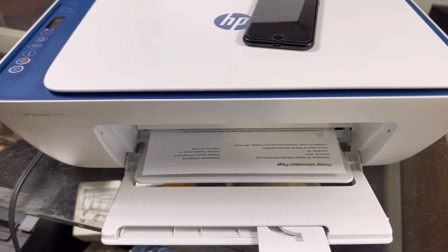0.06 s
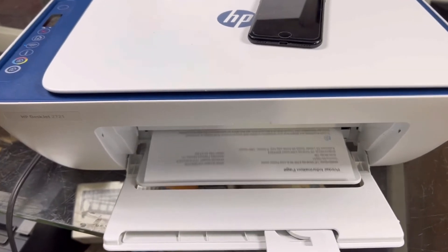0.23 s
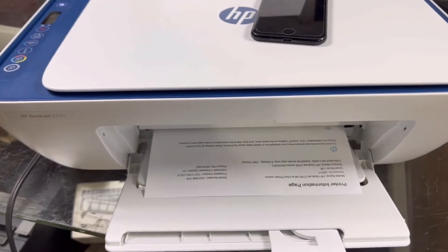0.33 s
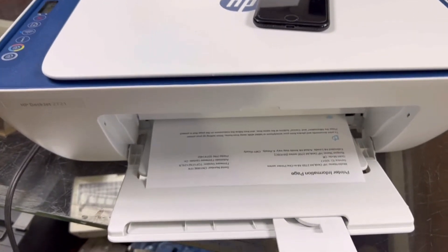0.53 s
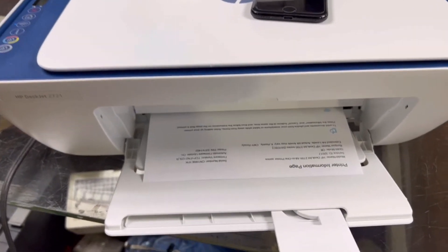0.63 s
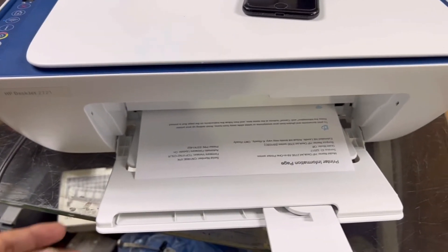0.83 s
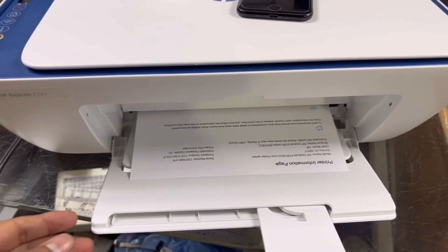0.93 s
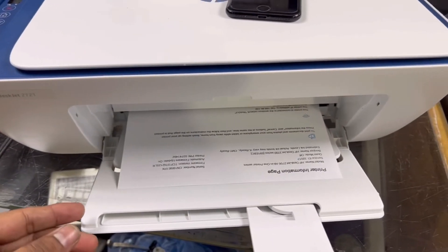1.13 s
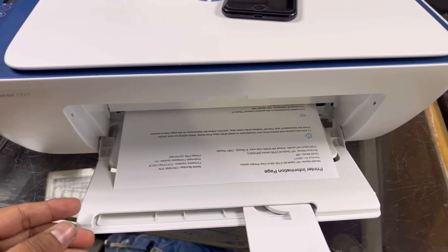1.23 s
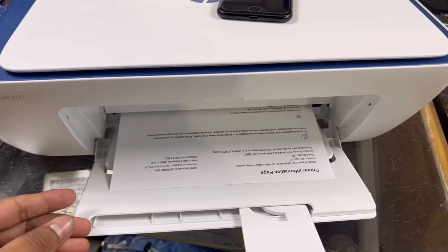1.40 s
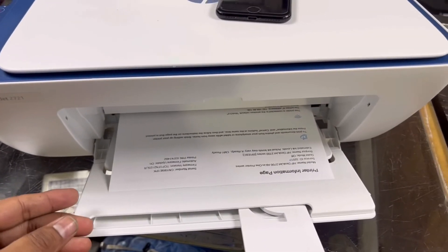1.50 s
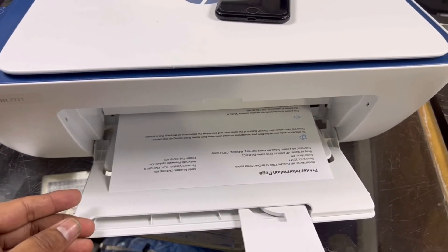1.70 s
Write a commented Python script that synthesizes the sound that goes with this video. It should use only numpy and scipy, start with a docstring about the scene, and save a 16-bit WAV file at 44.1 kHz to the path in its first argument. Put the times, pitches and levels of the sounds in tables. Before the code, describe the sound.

An inkjet printer feeds out a page in two short geared bursts, then clicks sharply

```python
"""In a small room, close by an inkjet printer: two short runs of its geared feed roller push a page out.
Uneven bursts of noise make the gear teeth, and resonances of the plastic housing answer them.
From the end of the second run the motor creeps on with a thin whine, and a catch cracks and rings.
Filtered noise makes the sheet sliding on its tray, the rumble of rolling parts, the hum and the room air.
A microphone pair hears the drive mostly a little to the right, the rest spread around."""
import sys
import numpy as np
from scipy import signal
from scipy.fft import rfft, irfft, next_fast_len
from scipy.io import wavfile
from scipy.ndimage import uniform_filter1d, map_coordinates

SR = 44100
rng = np.random.default_rng(int(sys.argv[2]) if len(sys.argv) > 2 else 0)


def unload_audio(sound):
    """Save the sound as a 16-bit wav file, at the path given as the first command line argument."""
    columns = np.transpose(np.atleast_2d(sound))
    # keep every value between -1 and 1, then stretch to whole-number steps
    steps = np.round(np.clip(columns, -1, 1) * 32767)
    wavfile.write(sys.argv[1], SR, steps.astype(np.int16))


N = 77175  # samples, 1.75 s

# Colours and partial levels are relative, except the idle tones, whose levels are absolute.
# low hum under the room: (frequency [Hz], level [dB])
HUM_COLOUR = [(20, -22), (38, -11.5), (55, -2.5), (75, -2.5), (100, -1.5), (140, -9), (200, -18.5),
              (320, -26), (600, -68)]
# room air: (frequency [Hz], level [dB])
AIR_COLOUR = [(120, -24.5), (270, -9), (380, -7), (550, -14), (900, -9.5), (1100, -11), (1480, -10),
              (2100, -17), (3200, -27.5), (4500, -40), (7000, -42.5), (15000, -69)]
# faint idle tones: (frequency [Hz], absolute level before flutter [dB])
IDLE_TONES = [(885, -74.5), (1400, -78), (1462, -76), (1620, -74.5)]
# sheet sliding over the tray: (time [s], level [dB])
SLIDE_LEVELS = [(0, -63), (0.06, -69), (0.13, -69.5), (0.18, -78), (0.34, -67), (0.41, -63.5), (0.455, -55),
                (0.5, -57.5), (0.55, -67.5), (0.628, -78.5), (0.636, -66), (0.685, -53), (0.73, -59.5),
                (0.78, -68), (0.83, -72), (0.9, -82), (1.22, -55.5), (1.29, -67), (1.38, -110)]
# hiss of paper on plastic: (frequency [Hz], level [dB])
PAPER_COLOUR = [(200, -29), (450, -1), (800, 4), (1300, 1.5), (2100, 2.5), (4200, 1.5), (6000, 0.5),
                (8500, 0.5), (11000, -3.5), (15000, -11)]
# roller singing faintly against the moving sheet: (time [s], level [dB])
SING_LEVELS = [(0.39, -88), (0.44, -60), (0.49, -60), (0.55, -101), (0.6, -86)]
# partials of that singing: (frequency [Hz], level before flutter [dB])
SING_TONES = [(700, -3), (1184, 0), (1292, -3.5), (1588, -1.5), (1723, -11)]
# low rumble of the rolling parts: (time [s], level [dB])
RUMBLE_LEVELS = [(0, -53.5), (0.08, -55), (0.17, -66), (0.34, -52.5), (0.5, -57.5), (0.6, -57), (0.72, -61),
                 (0.88, -82), (1.05, -61), (1.16, -58), (1.36, -61), (1.45, -62.5), (1.75, -76)]
# colour of that rumble: (frequency [Hz], level [dB])
RUMBLE_SPECTRUM = [(80, -24), (140, 4), (190, -0.5), (280, -5), (400, -10.5), (750, -11.5), (1100, -23),
                   (3000, -55)]
# roller drones on reaching speed and settling: (time [s], width [s], frequency [Hz], level [dB])
ROLLER_DRONES = [(0.251, 0.019, 268, -39.5), (0.298, 0.031, 197, -40.5), (0.438, 0.018, 194.5, -50),
                 (0.983, 0.014, 242.5, -27.5), (0.986, 0.0097, 136.3, -38), (1.251, 0.03, 178, -47.5),
                 (1.31, 0.06, 269.9, -55.5), (1.34, 0.055, 204.8, -58.5)]
# first feed run: (time [s], gear chatter before its trim [dB], housing rattle before its trims [dB])
FIRST_RUN = [(0.185, -77, -100), (0.193, -64, -50.5), (0.205, -49.5, -46), (0.221, -40, -36),
             (0.257, -37.5, -30.5), (0.289, -43.5, -36), (0.297, -42.5, -40), (0.319, -53.5, -49.5),
             (0.37, -64, -57.5)]
# second feed run: (time [s], gear chatter before its trim [dB], housing rattle before its trims [dB])
SECOND_RUN = [(0.918, -69.5, -59), (0.926, -56.5, -50.5), (0.95, -39, -38), (1.01, -41.5, -36),
              (1.02, -49.5, -47), (1.06, -59.5, -83)]
# housing colour in the first run: (frequency [Hz], level [dB])
FIRST_HOUSING = [(76, -70), (130, -18), (187, -5.5), (226, -5.5), (262, 1.5), (317, -4), (387, -15.5),
                 (529, -7.5), (592, -2.5), (655, -6.5), (831, -1), (1300, -14), (1540, -6), (1720, -3),
                 (2000, -28), (2600, -20), (3380, -62)]
# housing colour in the second run: (frequency [Hz], level [dB])
SECOND_HOUSING = [(190, -8), (330, -6), (462, -23), (504, -14), (670, -9), (724, 1), (947, -1.5),
                  (1020, -5.5), (1700, -9), (1910, -19), (2600, -17), (3380, -54)]
# resonances of the plastic shell: (frequency [Hz], width [Hz], relative level [dB])
SHELL_MODES = [(600, 39, 11), (875, 280, 7.5), (1070, 39, 10), (1713, 24, 13), (2133, 52, 4.5),
               (2500, 50, 14.5), (2646, 37, 7.5), (3016, 42, 13)]
# bare chatter of the gear teeth: (frequency [Hz], level [dB])
CHATTER_COLOUR = [(1200, -22), (2300, 2), (4200, 3), (6500, -2), (8500, -5), (11000, -11.5), (15000, -16.5)]
# snaps of plastic parts: (time [s], burst level [dB], brightness [dB per octave],
# ring frequency [Hz], ring level [dB])
PLASTIC_SNAPS = [(0.194, -53, 0, 1330, -45.5), (0.2521, -42, 7, 1700, -27.5),
                 (0.2955, -33.5, -5, 1040, -27), (0.631, -53, -2.5, 1020, -54.5),
                 (0.652, -45, -2.5, 1420, -48), (0.699, -48, -5, 517.4, -48),
                 (0.819, -64.5, -0.5, 7300, -68), (0.9232, -51, -6, 1100, -45),
                 (0.948, -37.5, 4.5, 1648, -34.5), (1.002, -37, -4, 4620, -35),
                 (1.006, -41.5, -3, 850, -35.5)]
# snap burst before its brightness tilt: (frequency [Hz], level [dB])
SNAP_SPECTRUM = [(80, -12.5), (250, 2.5), (500, 3), (1500, -2.5), (2700, -3), (4000, -1.5), (6500, -12),
                 (9000, -3.5), (15000, -22)]
# slow creep of the motor: (time [s], gear noise [dB], whine [dB])
CREEP_LEVELS = [(1.01, -40.5, -57), (1.04, -48.5, -52), (1.09, -48, -52.5), (1.17, -54.5, -50.5),
                (1.21, -48, -53.5), (1.23, -49.5, -52), (1.243, -50.5, -60), (1.29, -56.5, -68),
                (1.38, -72, -101)]
# gear noise of the creep, with a narrow gap near 9.7 kHz left by audio coding:
# (frequency [Hz], level [dB])
CREEP_SPECTRUM = [(65, -51), (110, -6), (278, -6.5), (427, -14.5), (484, -11), (686, -16), (760, -11),
                  (953, -14.5), (1150, -12), (1920, -22), (7150, -28.5), (8970, -65), (9740, -80),
                  (11700, -48)]
# motor whine: (frequency [Hz], level before flutter [dB])
WHINE_TONES = [(600, -11), (765, -2.5), (888, -6.5), (1184, -9), (1276, -11.5), (1529, -18), (1809, -19.5)]
# brief swell as the motor stops: (time [s], width [s], frequency [Hz], level [dB])
MOTOR_STOP = (1.229, 0.008, 778, -40)
# catch snapping over, seating, rattling once more: (time [s], crack level [dB], ring level [dB])
CATCH_CONTACTS = [(1.1788, -33.5, -36.5), (1.1824, -36.5, -31.5), (1.217, -45, -46)]
# plastic modes of the catch: (frequency [Hz], relative level [dB], 60 dB decay time [s])
CATCH_RINGS = [(423, -7, 0.088), (1063, -6.5, 0.056), (1324, 0, 0.08), (1630, 0, 0.057), (2123, 0, 0.06),
               (2457, -8.5, 0.14), (3660, 0, 0.048), (4030, 3.5, 0.04), (4910, -10, 0.043),
               (8700, -5, 0.027)]
# dry crack of the catch: (frequency [Hz], level [dB])
CRACK_SPECTRUM = [(120, -7), (400, 0.5), (1500, 1), (3000, -3), (4000, -0.5), (5200, -4.5), (6500, -11.5),
                  (9000, -8), (15000, -17)]
# drive at the microphone pair: (frequency [Hz], left-right likeness before clipping [ratio])
DRIVE_LIKENESS = [(300, 1.4), (650, 0.74), (1400, 0.8), (2300, 0.3), (3400, -0.1), (4900, 0.25), (6000, 0),
                  (7800, 0.5), (8600, 0.2), (9500, -1.18), (10800, -0.9), (11800, 0.6), (14200, 0.8)]
# drive at the microphone pair: (frequency [Hz], left minus right [dB])
DRIVE_BALANCE = [(380, -0.5), (700, -3.5), (1300, -4.5), (2400, -5), (4400, 1), (8000, 0)]
# diffuse sound at the microphone pair: (frequency [Hz], left-right likeness before clipping [ratio])
DIFFUSE_LIKENESS = [(100, 0.99), (250, 0.89), (450, 0.39), (800, 0.089), (1600, 0.42), (2400, -0.073),
                    (7800, 0.26), (8600, -0.014), (9500, -1.2), (10800, -1.02), (11800, -0.35),
                    (12700, 0.75)]

# Wavers scale a random curve, as a share of the frequency.
HUM_DB, HUM_TONE_HZ, HUM_TONE_DB = -51.5, 76.3, -56  # levels before the hum's swell
HUM_SWELL_DB = 2  # scales a random curve
AIR_MID_DB, AIR_SETTLE_DB_PER_S = -60.5, 0.5  # level halfway through, then its fall
PARTIAL_FLUTTER_DB = 2.5  # scales a random curve
SING_WAVER, WHINE_WAVER, CATCH_WAVER = 0.004, 0.006, 0.01166
TEETH_PER_S = 1300  # base rate, scaled by loudness and unevenness
TOOTH_SCATTER_DB, TOOTH_T60_S = 3.5, 0.007
CHATTER_TRIM_DB, RATTLE_TRIM_DB, RING_TRIM_DB = 1.5, 3, -5
SNAP_ATTACK_S, SNAP_T60_S = 0.0003, 0.061
RING_WAVER, RING_T60_S = 0.0594, 0.044
CATCH_BUILD_S, CRACK_T60_S = 0.0012, 0.045
ROOM_T60_S, ROOM_DB = 0.32, -11.5  # reflections relative to the drive
TOP_HZ = 15750


def amp(db):
    """Decibels to gain."""
    return 10 ** (np.asarray(db) / 20)


def unit(x):
    """Scale to rms 1."""
    return x / np.sqrt(np.mean(x ** 2) + 1e-20)


def along(points, hz):
    """Interpolate (frequency [Hz], value) points on a log frequency axis."""
    f, v = np.transpose(points)
    return np.interp(np.log(hz + 1), np.log(f + 1), v)


def gains(rows):
    """One gain curve for each level column, practically silent outside the rows."""
    s, *levels = np.transpose(rows)
    t = np.arange(N) / SR
    return [amp(np.interp(t, s, level, left=-140, right=-140)) for level in levels]


def wobble(rate):
    """A smooth random curve with rate knots a second."""
    knots = rng.standard_normal(int(N * rate / SR) + 4)
    return map_coordinates(knots, [np.arange(N) * rate / SR])


def filtered(x, response):
    """Shape x by a response of frequency."""
    m = next_fast_len(N + SR // 2)  # room for the tail
    spectrum = rfft(x, m) * response(np.fft.rfftfreq(m, 1 / SR))
    return irfft(spectrum, m)[..., :N]


def coloured(x, spectrum):
    """Give x a colour, at rms 1."""
    return unit(filtered(x, lambda hz: amp(along(spectrum, hz))))


def noise():
    """Two unrelated white noises."""
    return rng.standard_normal((2, N))


def tone(hz, waver, rate):
    """A wavering sine of rms 1, a quarter cycle apart in the two channels."""
    cycles = np.cumsum(hz * (1 + waver * wobble(rate))) / SR
    start = rng.uniform(0, 2 * np.pi)
    return np.sqrt(2) * np.sin(2 * np.pi * cycles + start + np.array([[0], [np.pi / 2]]))


def chord(partials, waver):
    """Several tones, each wavering in pitch and fluttering in level."""
    out = np.zeros((2, N))
    for hz, db in partials:
        level = amp(db + PARTIAL_FLUTTER_DB * wobble(29.95))
        out += level * tone(hz, waver, rate=70)
    return out


def swell(s, width, hz, db):
    """A rough tone that rises and fades around time s in a bell curve."""
    bell = np.exp(-((np.arange(N) / SR - s) / width) ** 2)
    return amp(db) * bell * tone(hz, waver=0.0316, rate=60)


def struck(t, attack, t60):
    """A quick rise and an exponential decay."""
    return (1 - np.exp(-t / attack)) * np.exp(-np.log(1000) * t / t60)


def teeth(rate, scatter_db, t60):
    """Uneven tooth impacts, each a tiny decaying noise burst, levelled over about 11 ms."""
    uneven_rate = rate * np.exp(.3 * wobble(300))
    hits = np.diff(np.floor(np.cumsum(uneven_rate / SR)), prepend=0)
    energy = hits * amp(scatter_db * rng.standard_normal(N)) ** 2
    decay = np.exp(-np.log(10 ** 6) / (t60 * SR))  # energy, so a million to one is 60 dB
    energy = signal.lfilter([1], [1, -decay], energy)
    local_mean = np.abs(uniform_filter1d(energy, size=500))
    return noise() * np.sqrt(np.abs(energy) / (local_mean + 1e-9))


def background():
    """A low unsteady hum, faint idle tones and room air that slowly settles."""
    hum = amp(HUM_DB) * coloured(noise(), HUM_COLOUR)
    hum = hum + amp(HUM_TONE_DB) * tone(HUM_TONE_HZ, waver=0.0503, rate=14.23)
    from_middle = (np.arange(N) - N / 2) / SR
    air = amp(AIR_MID_DB - AIR_SETTLE_DB_PER_S * from_middle) * coloured(noise(), AIR_COLOUR)
    return hum * amp(HUM_SWELL_DB * wobble(21.78)) + air + chord(IDLE_TONES, waver=0.0042)


def sheet():
    """Paper hisses over the tray with a fine grain; the roller sings faintly against it."""
    slide, = gains(SLIDE_LEVELS)
    sing, = gains(SING_LEVELS)
    grainy = noise() * amp(0.54 * wobble(360))
    return slide * coloured(grainy, PAPER_COLOUR) + sing * chord(SING_TONES, SING_WAVER)


def roller():
    """A soft noise rumble of rolling parts, and short low drones that swell and fade."""
    rumble, = gains(RUMBLE_LEVELS)
    drones = sum(swell(*row) for row in ROLLER_DRONES)
    return drones + rumble * coloured(noise(), RUMBLE_SPECTRUM)


def housing(hz):
    """Response of the plastic shell: a sum of resonances with alternating sign."""
    out = 0
    for k, (centre, width, db) in enumerate(SHELL_MODES):
        damping = 1j * hz * width
        out = out + (-1) ** k * amp(db) * damping / (centre * centre - hz * hz + damping)
    return out


def feed(run, colour):
    """Gear teeth chatter, denser when louder, and shake the housing."""
    chatter, rattle = gains(run)
    rate = TEETH_PER_S * (.3 + np.sqrt(chatter / chatter.max()))
    impacts = teeth(rate, TOOTH_SCATTER_DB, TOOTH_T60_S)
    shell = amp(RATTLE_TRIM_DB) * coloured(impacts, colour)
    shell = shell + amp(RING_TRIM_DB) * unit(filtered(impacts, housing))
    return amp(CHATTER_TRIM_DB) * chatter * coloured(impacts, CHATTER_COLOUR) + rattle * shell


def snaps():
    """Each snap is a sharp noise burst and the brief ring of the part that was struck."""
    out = np.zeros((2, N))
    for s, db, tilt_db, ring_hz, ring_db in PLASTIC_SNAPS:
        t = np.maximum(np.arange(N) / SR - s, 0)
        colour = [(hz, level + tilt_db * np.log2(hz)) for hz, level in SNAP_SPECTRUM]
        burst = coloured(noise(), colour) * struck(t, SNAP_ATTACK_S, SNAP_T60_S)
        ring = tone(ring_hz, RING_WAVER, rate=ring_hz / 2) * struck(t, SNAP_ATTACK_S, RING_T60_S)
        out += amp(db) * burst + amp(ring_db) * ring
    return out


def creep():
    """The motor turns slowly: soft gear noise, a thin whine and a brief swell as it stops."""
    gears, whine = gains(CREEP_LEVELS)
    grind = gears * coloured(teeth(rate=470, scatter_db=-1.5, t60=0.026), CREEP_SPECTRUM)
    return grind + whine * chord(WHINE_TONES, WHINE_WAVER) + swell(*MOTOR_STOP)


def catch():
    """Each contact of the catch is a dry crack together with its ringing plastic modes."""
    out = np.zeros((2, N))
    for s, crack_db, ring_db in CATCH_CONTACTS:
        t = np.maximum(np.arange(N) / SR - s, 0)
        crack = coloured(noise(), CRACK_SPECTRUM) * struck(t, SNAP_ATTACK_S, CRACK_T60_S)
        ring = np.zeros((2, N))
        for hz, db, t60 in CATCH_RINGS:
            ring += amp(db) * tone(hz, CATCH_WAVER, rate=500) * struck(t, CATCH_BUILD_S, t60)
        out += amp(crack_db) * crack + amp(ring_db) * ring / np.sqrt(len(CATCH_RINGS))
    return out


def scatter(x, t60):
    """Dense room reflections that die away, different in the two channels."""
    t = np.arange(SR // 2) / SR
    tail = rng.standard_normal((2, len(t))) * amp(-60 * t / t60)
    tail = tail / np.linalg.norm(tail, axis=1, keepdims=True)
    return signal.fftconvolve(np.atleast_2d(x), tail, axes=1)[:, :N]


def microphones(pair, likeness):
    """Mix two unrelated channels as mid and side, so left and right have a given likeness."""
    def mid_side(hz):
        turn = np.arccos(np.clip(along(likeness, hz), -.995, .995)) / 2
        return np.array([np.cos(turn), np.sin(turn)])
    mid, side = filtered(pair, mid_side)
    return np.array([mid + side, mid - side])


def scene():
    """The drive stands mostly a little to the right; paper, room and hum spread all around."""
    drive = roller() + feed(FIRST_RUN, FIRST_HOUSING) + feed(SECOND_RUN, SECOND_HOUSING)
    drive = drive + snaps() + creep() + catch()
    halves = np.array([[.5], [-.5]])  # half the balance to each side
    direct = filtered(microphones(drive, DRIVE_LIKENESS),
                      lambda hz: amp(along(DRIVE_BALANCE, hz) * halves))
    diffuse = background() + sheet() + amp(ROOM_DB) * scatter(drive, ROOM_T60_S)
    return direct + microphones(diffuse, DIFFUSE_LIKENESS)


def record(dry):
    """Nothing is kept above the band limit."""
    return filtered(dry, lambda hz: hz < TOP_HZ)


dry = scene()
out = record(dry)
unload_audio(out)
```